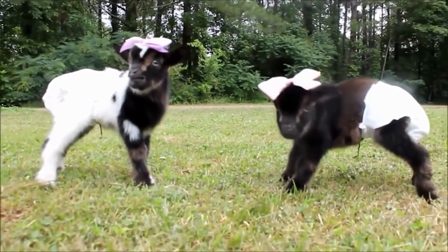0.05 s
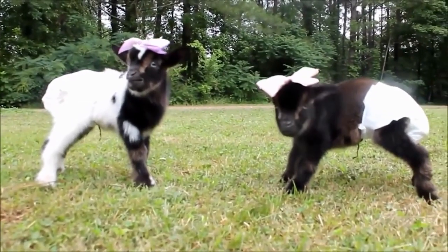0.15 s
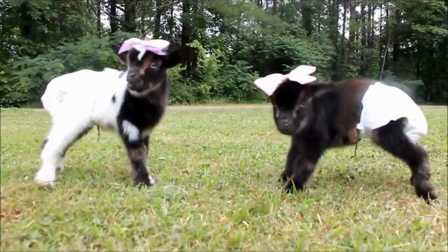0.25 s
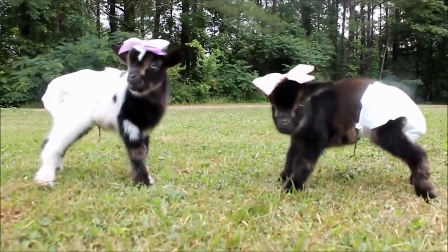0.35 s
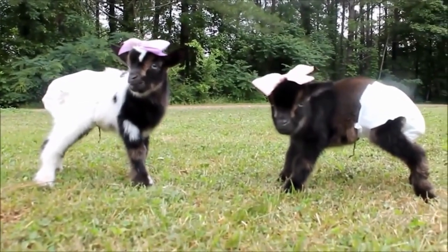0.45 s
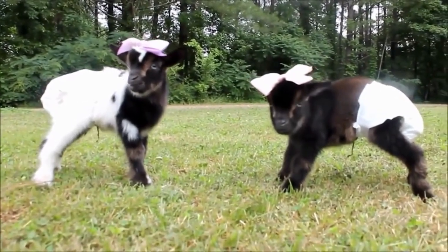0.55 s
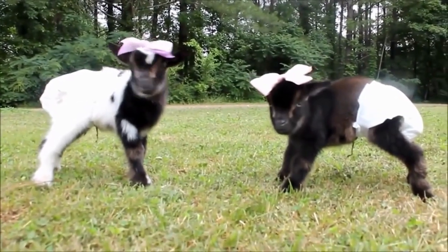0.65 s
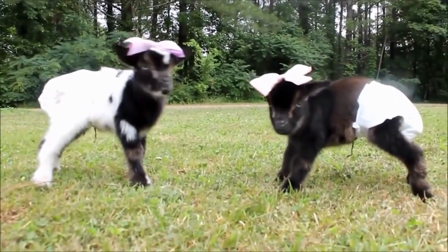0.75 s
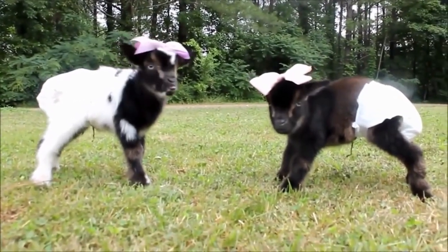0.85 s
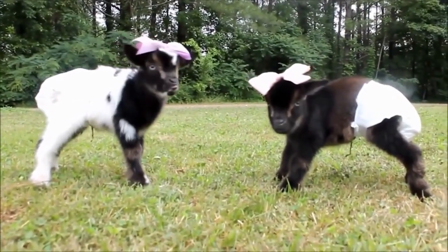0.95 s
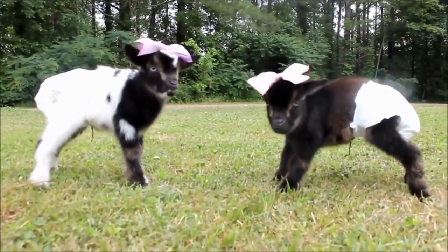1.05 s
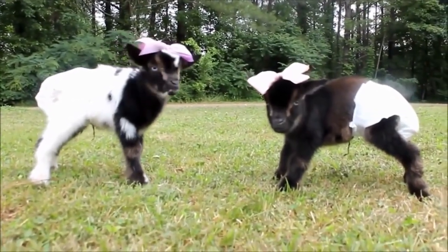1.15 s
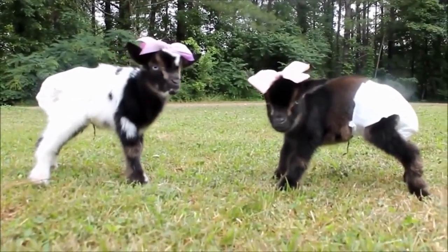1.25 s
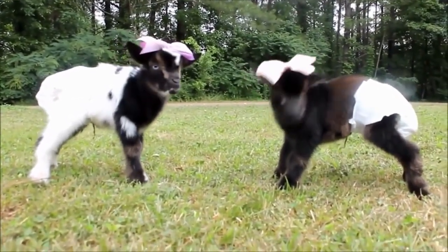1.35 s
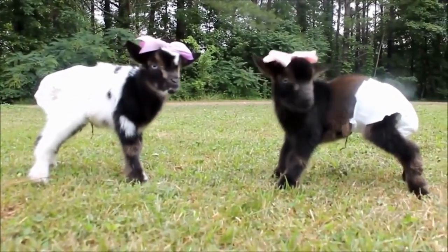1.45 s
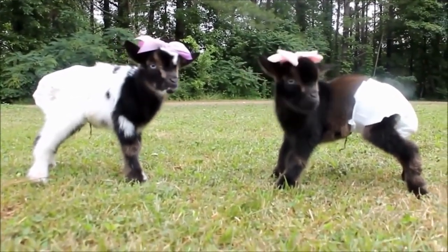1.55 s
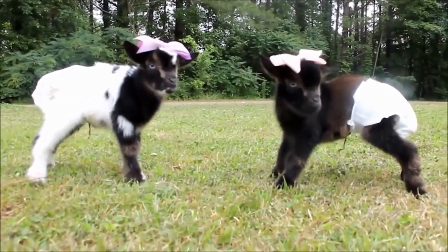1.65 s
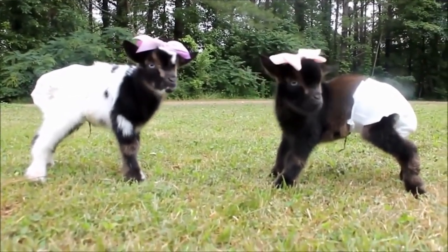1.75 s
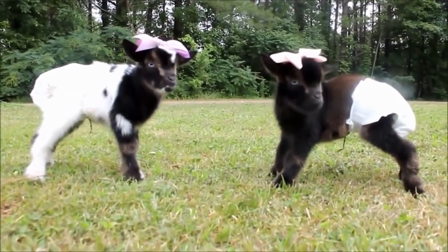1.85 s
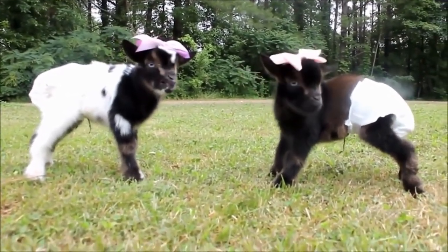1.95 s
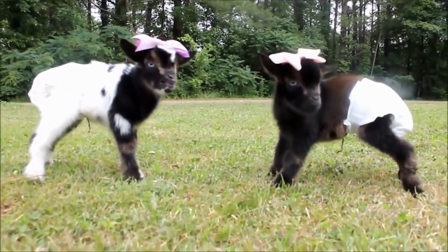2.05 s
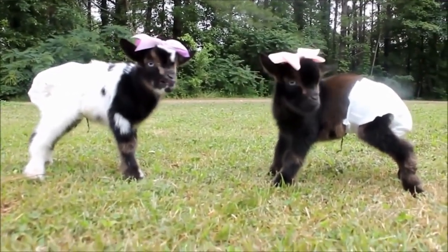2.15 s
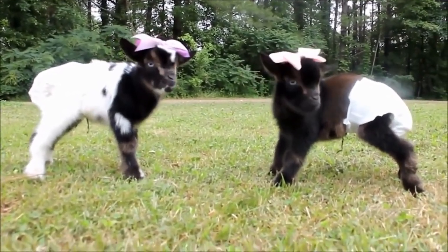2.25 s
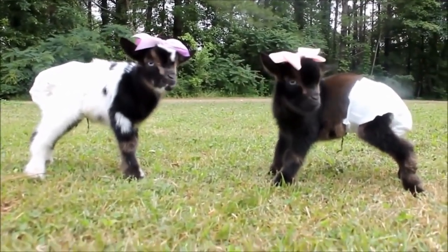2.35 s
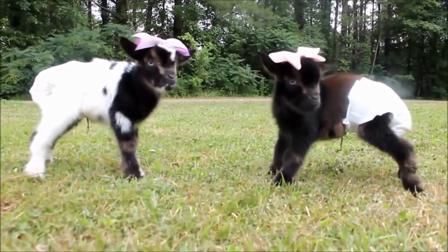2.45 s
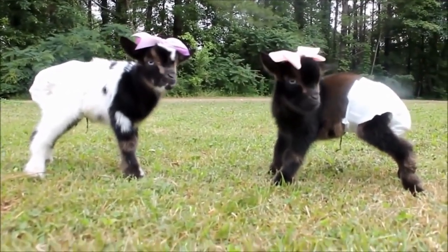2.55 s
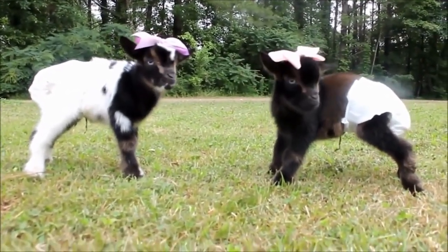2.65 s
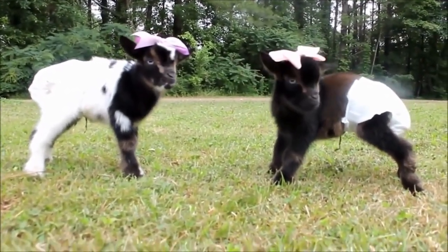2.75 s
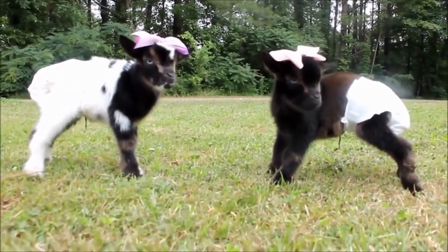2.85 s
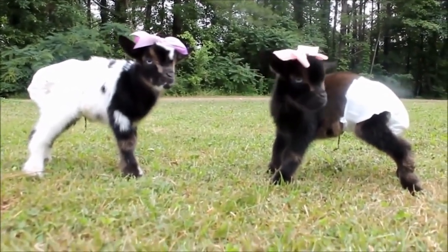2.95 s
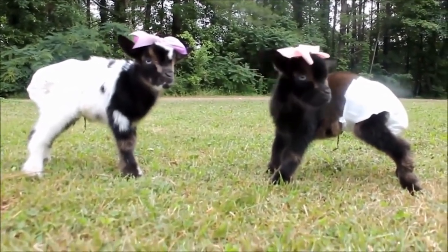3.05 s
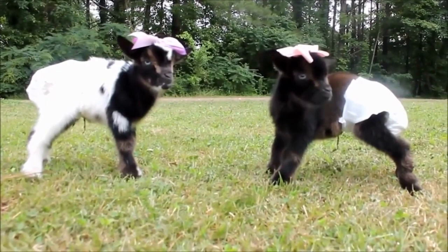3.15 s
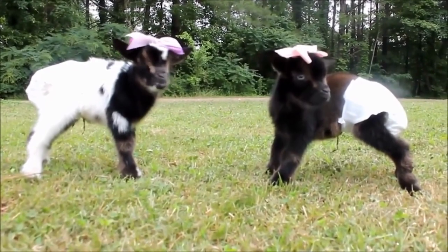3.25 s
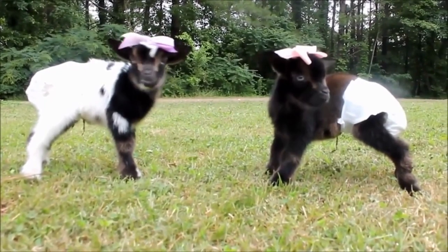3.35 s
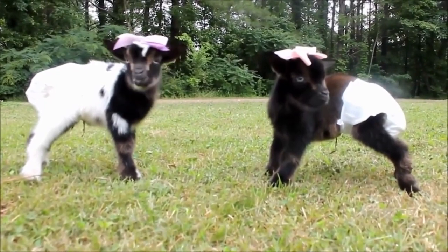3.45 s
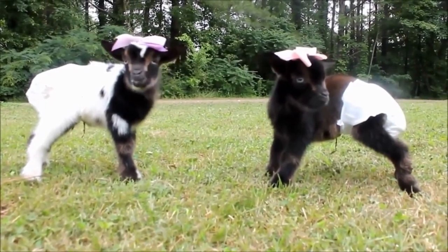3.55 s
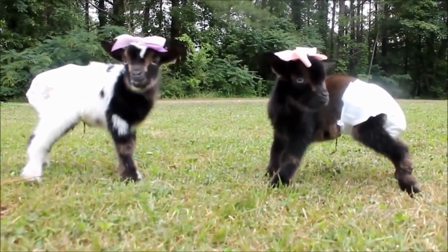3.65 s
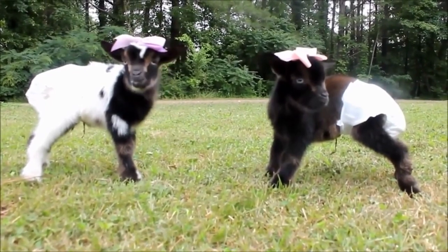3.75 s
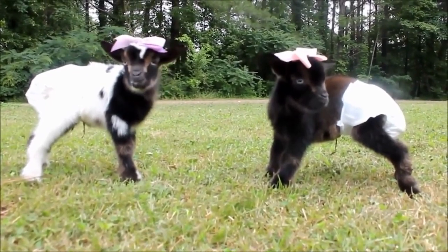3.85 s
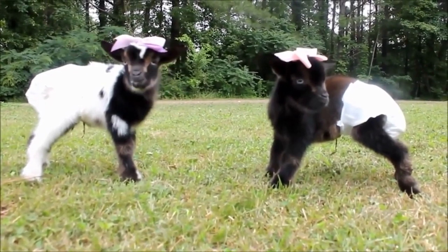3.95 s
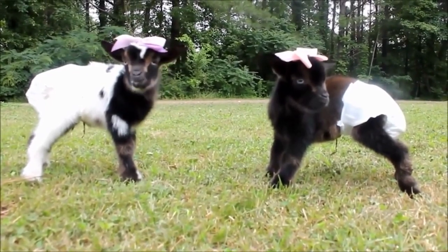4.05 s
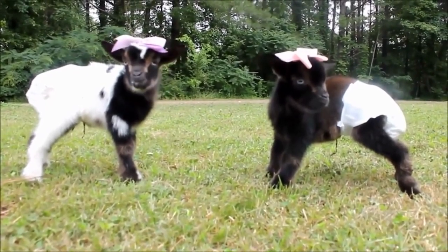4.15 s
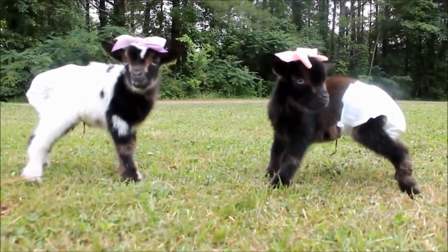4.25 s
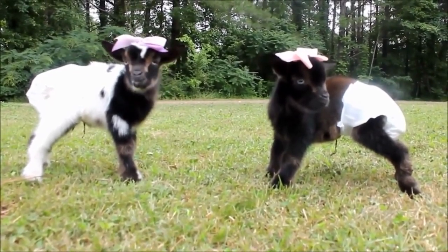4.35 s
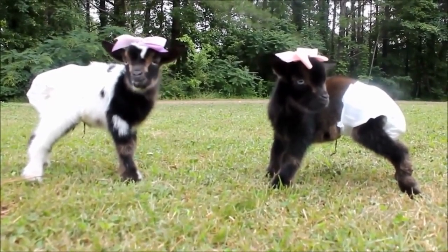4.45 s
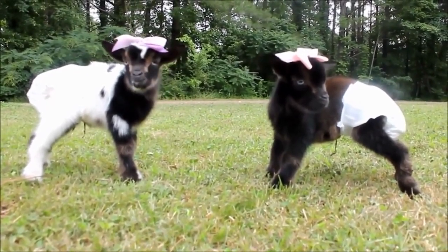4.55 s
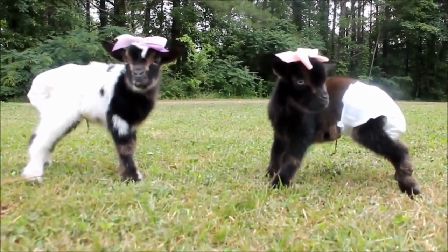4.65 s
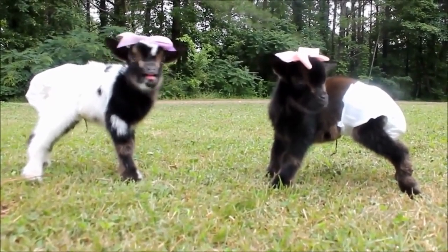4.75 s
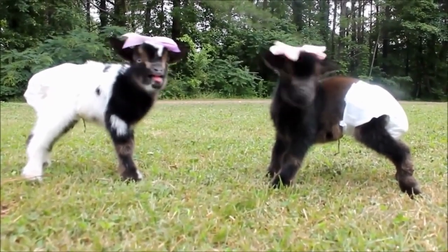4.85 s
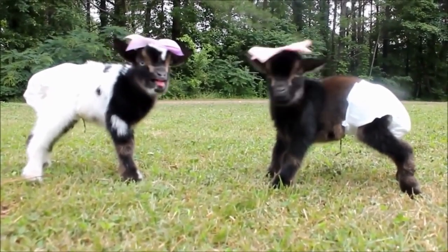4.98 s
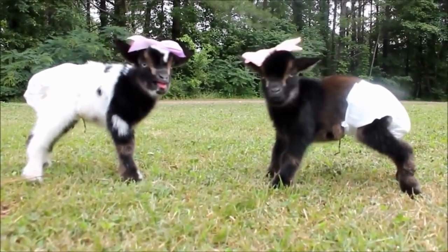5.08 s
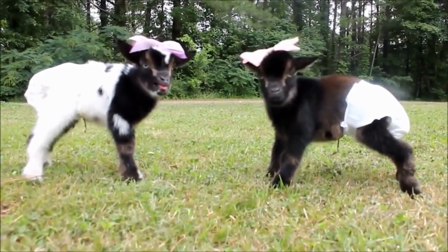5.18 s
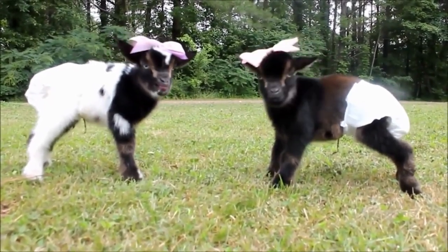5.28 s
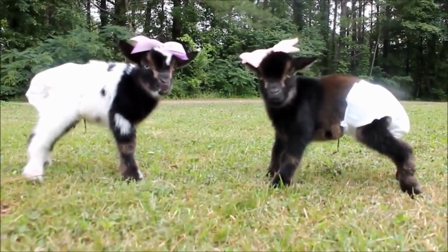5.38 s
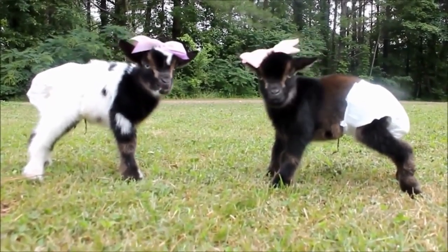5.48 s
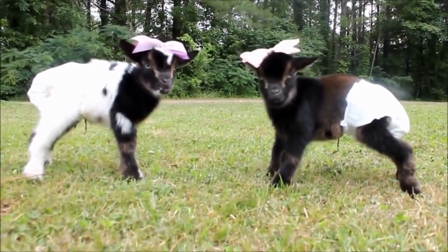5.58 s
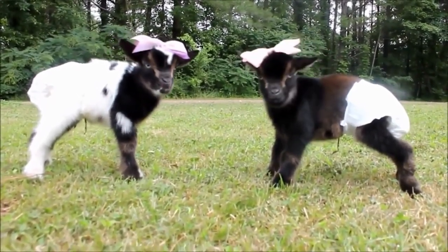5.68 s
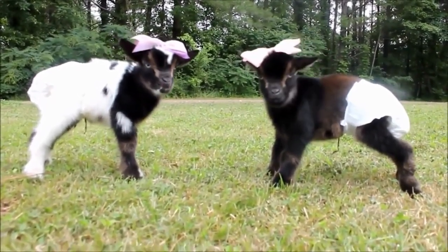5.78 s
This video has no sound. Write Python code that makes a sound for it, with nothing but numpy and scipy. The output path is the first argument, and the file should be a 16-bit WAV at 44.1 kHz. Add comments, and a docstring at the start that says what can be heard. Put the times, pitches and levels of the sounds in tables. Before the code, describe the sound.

Close, fairly dry pickup of two young goats in an open field. Bright nasal quavering bleat first, then quiet air, a weak low stutter leading through a hum into a second short bleat. Distant chirps and small snaps follow over a low rustling bed. Finally a sustained, shaking, raspy bleat breaks off in a breath, leaving a thin far rising whine.

```python
"""Goat kids on a lawn

Two goat kids bleat close by in short quavering bouts: vocal-fold harmonics through throat resonances,
with noise puffs at breaks and ends and as rasps within the long bleat. Behind them lie far traffic and
leaves (shaped noise), songbirds and a thin rising whine (fluttering near-sines) echoing in the trees,
blurred far chatter (band noise) and a few dry ticks (decaying modes)."""
import sys
import numpy as np
from scipy import signal
from scipy.fft import rfft, irfft
from scipy.io import wavfile
from scipy.ndimage import uniform_filter1d

SR = 44100
rng = np.random.default_rng(int(sys.argv[2]) if len(sys.argv) > 2 else 0)


def materialize(psi):
    """Save the field psi as 16-bit PCM at rate SR to the path in sys.argv[1].

    A 1-D psi becomes a single channel; in a 2-D psi each row is a channel.
    """
    bounded = np.clip(np.atleast_2d(psi).T, -1, 1)
    quanta = np.round(bounded * 32767).astype(np.int16)
    wavfile.write(sys.argv[1], SR, quanta)


N = 256651  # length in samples

# background colour: f/Hz, relative level per Hz/dB
AIR_COLOUR = [(12, -63), (20, -43), (72, -11), (122, -8.5), (214, -0.5), (325, -7.5), (363, -15), (493, -9),
              (770, -6.5), (989, -9.5), (2280, -13), (3190, -18), (4100, -20), (4840, -23), (15600, -44)]
# background level over time, held down under the long bleat: t/s, rumble level/dB, rustle level/dB
AIR_LEVEL = [(0.0, -62.5, -63.5), (0.47, -67, -61.5), (0.73, -65, -61.5), (1.44, -65, -60.5),
             (1.83, -65, -60), (2.19, -64.5, -61), (2.92, -62, -62), (3.66, -61, -60.5), (4.43, -64.5, -60),
             (4.62, -61.5, -60.5), (4.83, -68.5, -59.5), (5.1, -74, -68.5), (5.3, -66.5, -59.5),
             (5.49, -62, -58.5), (5.82, -68, -59.5)]
SPLIT_HZ = 427  # rumble below, rustle above

# throats: mouth width/Hz, mid modes and top modes [f/Hz, width/Hz, level/dB, sign],
# base level/dB of what is left above the treble corner
BRIGHT_THROAT = 287, [(3547, 270, -9.5, -1), (4984, 533, -0.5, 1)], [(6990, 820, -1, 1),
                 (9260, 820, -8.5, -1)], -26
LOW_THROAT = 390, [(2620, 690, 6, -1), (4800, 860, -4.5, 1)], [(6320, 380, -1.5, 1), (8600, 370, 0.5, -1),
              (11400, 1500, -14, 1)], -20
# bright kid's quavering voice, one table a bout: t/s, effort level/dB, pitch f/Hz
BRIGHT_VOICE = [
    [(0, -47, 888), (.01, -51.5, 896), (.062, -55, 940), (.088, -54, 919), (.116, -33.3, 812),
     (.124, -29, 823), (.134, -28.5, 849), (.148, -34.5, 833), (.166, -40, 783), (.188, -43, 811),
     (.204, -30, 862), (.214, -25.5, 865), (.232, -22.5, 796.6), (.256, -24, 808), (.284, -36, 738),
     (.292, -39.5, 755), (.302, -42, 840), (.318, -53, 705)],
    [(1.965, -47, 902), (1.985, -42.5, 786), (1.995, -38.5, 785.6), (2.015, -39.5, 822), (2.051, -54, 824),
     (2.066, -47, 844), (2.076, -32, 874), (2.085, -27.5, 877), (2.105, -23.5, 817), (2.123, -28.5, 850),
     (2.159, -39, 822), (2.176, -30.5, 877), (2.191, -24, 875), (2.209, -22, 813), (2.233, -26, 839.5),
     (2.265, -37.8, 789), (2.279, -40, 776), (2.295, -45, 688), (2.303, -41, 720), (2.312, -55, 691)],
    [(4.79, -63, 890), (4.8, -29.5, 842), (4.81, -21.5, 852.4), (4.852, -24.5, 902), (4.872, -23.5, 948),
     (4.884, -21, 946), (4.904, -23.5, 867), (4.94, -24, 958), (4.958, -22.8, 953), (4.976, -24, 883),
     (4.99, -20.5, 884), (5.002, -25, 889), (5.026, -23.5, 964), (5.042, -22.5, 964.7), (5.092, -24, 871),
     (5.158, -21.5, 898.5), (5.172, -23.5, 864), (5.2, -20.5, 835.5), (5.222, -24.5, 858),
     (5.256, -25, 780), (5.306, -20.5, 838.6), (5.318, -21.5, 840), (5.334, -23, 802), (5.348, -25, 824.5),
     (5.364, -25.5, 795), (5.376, -30.5, 727), (5.388, -30, 731), (5.408, -27, 780), (5.424, -46, 800)],
]
# its moving mouth, one table a bout: t/s, mouth f/Hz, throat shortening (factor on the upper resonances),
# mid ring level/dB, top ring level/dB
BRIGHT_MOUTH = [
    [(0, 1680, 0.83, -5, -19), (.062, 1830, 1.04, -1, -2), (.112, 1790, 0.99, -7.5, -12),
     (.132, 2130, 1.03, -35, -13), (.166, 2180, .92, -8, -9), (.212, 2130, 0.99, -3, -15),
     (.232, 2850, .89, -5, -16.5), (.256, 2330, 0.9, -1.5, -9), (.285, 2390, 1.11, -3, -42),
     (.318, 2150, 0.68, -28, -42)],
    [(1.965, 1800, 1.2, -25, -30), (1.99, 1750, 1.1, -16, -23), (2.015, 1780, 0.89, -11, -8.5),
     (2.085, 2190, 0.99, -10.5, -17), (2.105, 2120, 1.08, -9.5, -25), (2.123, 2330, 0.874, -8.5, -6),
     (2.16, 2420, 1.08, -5, -32), (2.191, 2260, 0.945, -6, -15), (2.21, 2330, 0.98, -2.5, -13),
     (2.235, 2350, 1.07, -4.5, -24), (2.27, 2440, 1.04, -7, -21), (2.312, 2300, 0.98, -28, -44)],
    [(4.788, 2300, 1.02, -34, -10), (4.81, 2100, 0.98, -10.5, -13.5), (4.865, 2500, .98, 2, -5.5),
     (4.95, 2560, 0.99, 2.5, -4), (5.04, 2520, 0.99, 0.5, -5.5), (5.12, 2530, 1.023, 0.5, -6),
     (5.2, 2536, 0.99, 0, -10), (5.26, 2453, 1.06, -5.5, -14.5), (5.32, 2500, 1.023, -0.5, -17.5),
     (5.39, 2330, 1.01, -6.5, -21), (5.426, 2320, 1.03, -16, -49)],
]
# treble of each bright bout, brightest in the long one: corner f/Hz, far-treble level/dB
BOUT_TREBLE = [(10540, -2), (9700, -5), (10800, 24)]
# nasal hum with the mouth open, one value a bout: level/dB
OPEN_NASAL_DB = [-20, -21, -18.5]
SHUT_HZ, SHUT_NASAL_DB, OPEN_HZ = 1726, 2.5, 2090  # the hum fades as the mouth resonance rises
NASAL_DB_PER_HZ = -0.0955  # hum dips on each upswing of the quaver
FIRM_DB, ROUGH_PER_DB = -34.5, 0.019  # below this effort the folds go slack and rough
# past this age of a bout the voice turns hoarser and more nasal
TIRED_S, HOARSE_PER_S, TIRED_NASAL_DB_PER_S = 0.22, 0.2, 8.5
SHIMMER_DB = 0.7  # rms tremble of the first harmonic; higher ones break up more
LEAST_ROUGH, ROUGHER_HZ = 0.022, 2800  # floor before weighting; the breath share grows with frequency
RASP_DB = 3.5  # rms of the short patches in which roughness comes and goes

# puffs of air at breaks and ends, and rasps within the long bleat: t/s, length/s, level/dB
BRIGHT_PUFFS = [(.31, 0.045, -43.5), (2.305, 0.036, -46.5), (5.42, 0.044, -45.5), (0.167, 0.046, -51),
                (2.15, 0.027, -48), (5.125, 0.05, -45), (5.245, .05, -45), (2.275, .025, -48)]
# puffs of air around the stutter: t/s, length/s, level/dB
LOW_PUFFS = [(1.515, 0.088, -52), (1.57, 0.023, -62), (1.635, 0.089, -57), (1.735, 0.11, -54),
             (1.83, 0.03, -54)]
# their mouth colour: f/Hz, width at -6 dB/Hz, relative level/dB
BRIGHT_PUFF_COLOUR = [(2480, 1060, -1.5), (3560, 680, -2.5), (5420, 350, 0.5), (7300, 3200, -18)]
LOW_PUFF_COLOUR = [(2000, 680, 2.5), (2670, 510, 0), (4900, 1100, -16), (7200, 880, -10), (8800, 1200, -13),
                   (12100, 1800, -20)]

# echo of the tree line: f/Hz, t60/s
WOOD = [(1000, 0.6), (4000, 0.56), (9000, 0.7)]
# straight slides of lower birds and of a high bird: t/s, length/s, first f/Hz, last f/Hz, level/dB
LOW_SLIDES = [(.5, .05, 3740, 3610, -69), (2.569, 0.038, 2900, 3200, -66), (2.62, 0.031, 4270, 3290, -58),
              (2.81, .02, 3520, 3330, -63.5), (2.965, 0.032, 4190, 3870, -60),
              (3.05, 0.022, 3600, 3300, -66), (3.11, .04, 2930, 2250, -67), (3.24, .06, 4440, 4430, -69),
              (3.25, .06, 2360, 2400, -72), (3.395, 0.038, 4380, 4470, -64.5), (3.45, .27, 4450, 4620, -69),
              (3.44, .035, 3180, 3950, -61), (3.53, 0.046, 4480, 4670, -64),
              (3.58, 0.031, 2750, 2600, -61.5), (3.6, .11, 2580, 2250, -65), (3.76, 0.086, 2390, 2570, -68),
              (4.475, .025, 4550, 4630, -62), (4.555, .028, 3690, 3180, -59.5),
              (4.58, 0.023, 3240, 3090, -63), (4.6, 0.022, 3150, 3600, -61)]
HIGH_SLIDES = [(2.555, 0.086, 9080, 9150, -73.5), (2.981, 0.013, 5470, 7060, -62),
               (2.994, 0.02, 7140, 7030, -63.5), (3.005, .02, 6510, 6010, -57),
               (3.47, 0.11, 3300, 2860, -69), (3.975, .03, 7500, 7460, -79),
               (4.357, .045, 5800, 5930, -60.5), (4.428, 0.011, 8450, 7000, -75),
               (4.44, 0.015, 6770, 5400, -55.5), (4.686, .1, 3450, 3900, -61.5)]
SLIDE_FADE_DB = -2.5
# falling song of arched notes: t/s, length/s, top f/Hz, level/dB
ARCHES = [(2.663, 0.069, 8340, -72), (2.767, 0.061, 8050, -69), (2.88, .033, 7540, -67)]
ARCH_RISE_S, ARCH_DROP_S, ARCH_DEPTH_HZ = 0.017, 0.018, 2200

# dry ticks: t/s, peak level/dB
TICKS = [(1.1044, -49.5), (3.1394, -54), (3.3604, -57), (3.569, -46), (3.6366, -48), (3.6487, -46),
         (3.7324, -51), (4.4847, -60), (4.5446, -52)]
# ringing modes of a tick: f/Hz, relative level/dB, t60/s
TICK_MODES = [(5240, 11, 0.0091), (6600, 7, 0.007), (8300, 2, 0.0097), (10100, -14, .006)]

# low kid's stutter: peak t/s, pace (factor on the length), effort level/dB, first pitch f/Hz,
# base pitch at the peak f/Hz, mouth f/Hz
STUTTER = [(1.54, .76, -42, 631, 629, 2160), (1.621, 0.97, -34, 722, 661, 1830),
           (1.719, 0.99, -35.5, 695, 666, 1868), (1.82, 0.93, -38.5, 716, 665, 1850)]
# one syllable: t from its peak/s (before pace), effort level/dB, share of the pitch sag, added pitch/Hz,
# mouth factor, top ring level/dB, roughness before weighting
SYLLABLE = [(-.038, -21, .1, 0, 0.92, -8, .08), (-.023, -11, 0.021, 0.5, 1.04, -11, .07),
            (-.011, -5, 0.34, 1, 1.04, -17.5, .07), (0, -.1, 1, -1, 0.93, -25, 0.16),
            (.012, -5.5, 1.1, -9, 0.98, -28, 0.2), (.026, -14.5, 1.07, -86, 1.08, -37, .25),
            (.044, -23, 1.3, -100, 1.2, -36, .25)]
STUTTER_SHORTER, STUTTER_MID_DB, STUTTER_NASAL_DB = 1.018, -16, 9.5
# soft, mostly rising hum that leads into the second bright bout, voiced through the low throat:
# t/s, effort level/dB, pitch f/Hz, nasal level/dB
LEAD_IN = [(1.846, -54, 650, 0), (1.858, -51.5, 648, 0), (1.879, -52, 644, -9), (1.905, -55, 686, 16),
           (1.931, -48.5, 755, 11), (1.951, -50.5, 712, 10.5), (1.966, -47, 720, 14)]
LEAD_IN_MOUTH_HZ, LEAD_IN_SHORTER, LEAD_IN_ROUGH = 1980, 1.05, 0.29
LEAD_IN_MID_DB, LEAD_IN_TOP_DB = -23, -34

# far birds blurred by the wood: t/s, level/dB
CHATTER = [(3.15, -89), (3.25, -66), (3.45, -68), (3.68, -65), (3.82, -74), (3.95, -87), (4.4, -87),
           (4.48, -67), (4.62, -72), (4.7, -75), (4.79, -67)]
# their bands: f/Hz, width at -6 dB/Hz, relative level/dB
CHATTER_BAND = [(4000, 1100, 0), (4460, 1300, -1)]
# thin rising whine farther off: t/s, f/Hz, level/dB
WHINE = [(5.455, 1748, -48), (5.487, 1820, -58), (5.563, 1990, -49), (5.589, 2110, -51), (5.6, 2137, -79)]

HISS_DB, EDGE_HZ = -83.5, 15750  # hiss rms ahead of the band limit; top of the band


def gain_of(db):
    """Amplitude factor of a level in dB."""
    return 10 ** (np.asarray(db) / 20)


def evened(x):
    """Signal brought to rms 1."""
    return x / np.sqrt(np.mean(x ** 2) + 1e-20)


def smooth(noise, size):
    """Noise averaged twice along time, so that little of it is fast."""
    once = uniform_filter1d(noise, size, axis=0)
    return uniform_filter1d(once, size, axis=0)


def read(points, hz):
    """Value of a spectrum table on a log-frequency axis."""
    f, value = np.transpose(points)
    return np.interp(np.log(hz + 1), np.log(f + 1), value)


def add(mix, s, sound):
    """Lay a sound into the mix at a time in seconds."""
    part = mix[max(round(s * SR), 0):][:len(sound)]
    part += sound[:len(part)]


def peak(hz, centre_hz, width):
    """Complex response of one resonance, 1 at its centre."""
    return width / (width + 2j * (hz - centre_hz))


def coloured_noise(bands):
    """Noise of rms 1 through a sum of squared resonances."""
    hz = np.fft.rfftfreq(N, 1 / SR)
    response = sum(gain_of(db) * peak(hz, f, width) ** 2 for f, width, db in bands)
    return evened(irfft(rfft(rng.standard_normal(N)) * response, N))


def air():
    """Traffic and leaves: random short-time spectra with drifting patches; rumble and rustle move apart."""
    frames, hz = N // 256 + 5, np.fft.rfftfreq(1024, 1 / SR)
    a, b, patches = rng.standard_normal((frames, 513, 3)).T
    patches = uniform_filter1d(patches, size=10, axis=0)  # across frequency
    patches = evened(uniform_filter1d(patches, size=14, axis=1))  # across time
    spectra = (a + 1j * b) * gain_of(read(AIR_COLOUR, hz)[:, None] + 1.18 * patches)
    low_share = 1 / (1 + (hz[:, None] / SPLIT_HZ) ** 4)  # share of the power

    def layer(share):
        return evened(signal.istft(spectra * np.sqrt(share), nperseg=1024, noverlap=768)[1][:N])

    s, rumble_db, rustle_db = np.transpose(AIR_LEVEL)
    t = np.arange(N) / SR
    rumble = gain_of(np.interp(t, s, rumble_db)) * layer(low_share)
    rustle = gain_of(np.interp(t, s, rustle_db)) * layer(1 - low_share)
    return rumble + rustle


def bright_bout(voice, mouth, open_nasal_db):
    """Controls of one bout: hum follows mouth, quaver and tiredness; roughness follows effort and tiredness."""
    s, effort_db, hz = np.transpose(voice)
    mouth_s, *opening = np.transpose(mouth)
    t = np.arange(s[0], s[-1], 0.001)
    effort_db, hz = np.interp(t, s, effort_db), np.interp(t, s, hz)
    mouth_hz, shorter, mid_db, top_db = (np.interp(t, mouth_s, c) for c in opening)
    quaver_hz = hz - uniform_filter1d(hz, size=90, mode="nearest")
    tired_s = np.maximum(t - s[0] - TIRED_S, 0)
    nasal_db = np.interp(mouth_hz, [SHUT_HZ, OPEN_HZ], [SHUT_NASAL_DB, open_nasal_db])
    nasal_db += NASAL_DB_PER_HZ * quaver_hz + TIRED_NASAL_DB_PER_S * tired_s
    slack = np.maximum(ROUGH_PER_DB * (FIRM_DB - effort_db), 0)
    rough = slack + HOARSE_PER_S * tired_s
    return np.transpose([t, effort_db, hz, mouth_hz, shorter, mid_db, top_db, nasal_db, rough])


def throat_response(k, hz, throat, mouth_hz, shorter, mid_db, top_db, nasal_db, corner_hz, treble_db):
    """Throat resonances weigh every harmonic at its momentary pitch, evened to a steady total power."""
    mouth_width, mids, tops, left_db = throat
    tract = peak(k * hz, mouth_hz, mouth_width)
    for ring_db, modes in (mid_db, mids), (top_db, tops):  # like signs leave a notch between two modes
        for centre_hz, width, db, sign in modes:
            tract += sign * gain_of(db + ring_db) * peak(k * hz, centre_hz * shorter, width)
    # a duller voice loses its far treble
    far_treble = gain_of(left_db + 2.4 * top_db + treble_db)
    tract *= 1 / (1 + (k * hz / corner_hz) ** 10) + far_treble
    tract[0] *= gain_of(nasal_db)  # the nasal hum is the first harmonic
    return tract / np.sqrt((abs(tract) ** 2).sum(0) / 2)


def fold_drive(k, hz, rough):
    """Each harmonic of the folds trembles on its own, and breath noise spreads around it."""
    count, harmonics = len(hz), len(k)
    tremble = evened(smooth(rng.standard_normal((count, harmonics)), size=300).T)
    a, b = smooth(rng.standard_normal((count, harmonics, 2)), size=45).T
    breath = (evened(a) + 1j * evened(b)) / np.sqrt(2)
    patches = evened(smooth(rng.standard_normal(count), size=450))
    rough = np.maximum(rough, LEAST_ROUGH) * gain_of(RASP_DB * patches)
    rough = np.clip(rough * (0.1 + 0.75 * k * hz / ROUGHER_HZ), 0, 0.9)
    tone = np.sqrt(1 - rough ** 2) * gain_of(SHIMMER_DB * np.sqrt(k) * tremble)
    return tone + rough * breath


def bleat(rows, throat, fade, corner_hz, treble_db, jitter=0.0039):
    """Breathy vocal-fold harmonics through the throat; returns start time and sound."""
    s, *columns = np.transpose(rows)
    t = np.arange(s[0], s[-1], 1 / SR)
    effort_db, hz, *shape, rough = (
        uniform_filter1d(np.interp(t, s, c), size=200, mode="nearest") for c in columns)
    wobble = evened(smooth(rng.standard_normal(len(t)), size=110))
    turns = np.cumsum(hz * (1 + jitter * wobble)) / SR
    k = np.arange(1, 22)[:, None]  # harmonic numbers
    tract = throat_response(k, hz, throat, *shape, corner_hz, treble_db)
    harmonics = tract * fold_drive(k, hz, rough) * np.exp(2j * np.pi * k * turns)
    voice = -harmonics.real.sum(0)  # sign of the voice waveform
    edge = np.clip(np.minimum(t - s[0], s[-1] - t) / fade, 0, 1)
    return s[0], gain_of(effort_db) * voice * edge


def puffs(table, colour):
    """Unvoiced air through the open mouth: coloured noise in quickly rising humps."""
    out = np.zeros(N)
    breath = coloured_noise(colour)
    for s, length, db in table:
        u = np.arange(0, 1, 1 / (length * SR))
        hump = np.sin(np.pi * u ** 0.41)
        add(out, s, gain_of(db) * breath[round(s * SR):][:len(u)] * hump)
    return out


def bright_kid():
    """The bright voice: quavering fold harmonics in three bouts, with puffs and rasps of air."""
    out = puffs(BRIGHT_PUFFS, BRIGHT_PUFF_COLOUR)
    for voice, mouth, nasal_db, treble in zip(BRIGHT_VOICE, BRIGHT_MOUTH, OPEN_NASAL_DB, BOUT_TREBLE):
        add(out, *bleat(bright_bout(voice, mouth, nasal_db), BRIGHT_THROAT, 0.0028, *treble))
    return out


def wood(x, delay=0.021):
    """Echo of the tree line: sparse taps of random sign, each band dying at its own speed."""
    taps = np.zeros(SR)
    at = np.arange(0, SR - 20, 20)
    taps[at + rng.integers(0, 20, len(at))] = rng.choice([-1., 1.], len(at))
    hz, t, z = signal.stft(taps, SR, nperseg=256)
    decay = gain_of(-60 * t / read(WOOD, hz)[:, None])
    tail = signal.istft(z * decay, SR, nperseg=256)[1]
    tail = np.concatenate([np.zeros(round(delay * SR)), tail / np.linalg.norm(tail)])
    return signal.fftconvolve(x, tail)[:N]


def whistle(notes, blur):
    """Near-sine notes; moving air on the way makes them flutter."""
    out = np.zeros(N)
    for rows in notes:
        s, hz, db = np.transpose(rows)
        t = np.arange(s[0], s[-1], 1 / SR)
        a, b = uniform_filter1d(rng.standard_normal((len(t), 2)), size=130, axis=0).T
        flutter = 1 + blur * evened(a) + 1j * blur * evened(b)
        turn = np.exp(2j * np.pi * np.cumsum(np.interp(t, s, hz)) / SR)
        tone = np.sqrt(2 / (1 + blur ** 2)) * (flutter * turn).real
        add(out, s[0], gain_of(np.interp(t, s, db)) * tone * signal.windows.tukey(len(t), 0.3))
    return out


def slide(s, length, first_hz, last_hz, db):
    """A note that glides straight from one pitch to another, fading a little."""
    return [(s, first_hz, db), (s + length, last_hz, db + SLIDE_FADE_DB)]


def low_birds():
    """Lower songbirds: fluttering slides."""
    return whistle([slide(*row) for row in LOW_SLIDES], blur=0.52)


def ticks():
    """Short dry snaps in the grass: a few quickly dying modes struck together."""
    out, t = np.zeros(N), np.arange(900) / SR
    snap = sum(gain_of(db - 60 * t / t60) * np.sin(2 * np.pi * hz * t) for hz, db, t60 in TICK_MODES)
    for s, db in TICKS:
        add(out, s, gain_of(db) * snap / abs(snap).max())
    return out


def syllable(peak_s, pace, effort_db, first_hz, peak_hz, mouth_hz):
    """Controls of one stuttered syllable: it swells, moves in pitch, dulls and drops away."""
    rows = []
    for s, db, sag, drop_hz, opening, top_db, rough in SYLLABLE:
        hz = first_hz + sag * (peak_hz - first_hz) + drop_hz
        rows.append((peak_s + pace * s, effort_db + db, hz, mouth_hz * opening, STUTTER_SHORTER,
                     STUTTER_MID_DB, top_db, STUTTER_NASAL_DB, rough))
    return rows


def lead_in():
    """Controls of the soft hum: effort, pitch and nasal level move while the mouth holds still."""
    return [(s, db, hz, LEAD_IN_MOUTH_HZ, LEAD_IN_SHORTER, LEAD_IN_MID_DB, LEAD_IN_TOP_DB, nasal_db, LEAD_IN_ROUGH)
            for s, db, hz, nasal_db in LEAD_IN]


def low_throat_voices():
    """Stuttered fold pulses of the low kid, its puffs, and the soft lead-in hum, all with soft starts."""
    out = puffs(LOW_PUFFS, LOW_PUFF_COLOUR)
    for rows in [syllable(*row) for row in STUTTER] + [lead_in()]:
        add(out, *bleat(rows, LOW_THROAT, fade=0.0074, corner_hz=13100, treble_db=7))
    return out


def arch(s, length, top_hz, db):
    """A note that shoots up, holds and drops away."""
    low_hz, end = top_hz - ARCH_DEPTH_HZ, s + length
    return [(s, low_hz, db), (s + ARCH_RISE_S, top_hz, db), (end - ARCH_DROP_S, top_hz, db), (end, low_hz, db)]


def high_birds():
    """High song of arches and slides, fluttering more than the lower birds."""
    return whistle([arch(*row) for row in ARCHES] + [slide(*row) for row in HIGH_SLIDES], blur=0.71)


def chatter():
    """Many far notes smear into a fluttering band of noise."""
    s, db = np.transpose(CHATTER)
    band = coloured_noise(CHATTER_BAND)
    flutter = evened(uniform_filter1d(rng.standard_normal(N), size=1300))
    level_db = np.interp(np.arange(N) / SR, s, db, -99, -99)
    return gain_of(level_db + 2.1 * flutter) * band


def whine():
    """A thin rising near-sine with little flutter."""
    return whistle([WHINE], blur=0.096)


def scene():
    """Direct sounds, the echo of the trees, and the background."""
    kids = bright_kid() + low_throat_voices()
    low, high, far_whine = low_birds(), high_birds(), whine()
    echo = wood(gain_of(-37) * kids + gain_of(-3) * high + gain_of(-6) * low + gain_of(-8) * far_whine)
    return (kids + high + low + far_whine + echo + chatter() + ticks() + air())[None]


def record(dry):
    """Gain control eases loud calls down and recovers slowly; then bass cut, hiss and band limit."""
    power_db = 10 * np.log10(abs(uniform_filter1d(dry[0] ** 2, size=2000)) + 1e-12)
    fall = np.arange(N) * 13.0 / SR  # the held level sinks 13 dB a second
    held_db = np.maximum.accumulate(power_db + fall) - fall
    over_db = np.maximum(held_db + 26.0, 0)  # excess over -26 dB
    ducked = dry / gain_of(0.2 * uniform_filter1d(over_db, size=2000))  # a fifth of the excess comes off
    trimmed = signal.lfilter(*signal.butter(2, 45, "high", fs=SR), ducked)
    hissy = trimmed + gain_of(HISS_DB) * rng.standard_normal(dry.shape)
    band_limit = signal.firwin(511, EDGE_HZ, window=("kaiser", 9), fs=SR)
    return signal.oaconvolve(hissy, band_limit[None], "same")


dry = scene()
out = record(dry)
materialize(out)
```